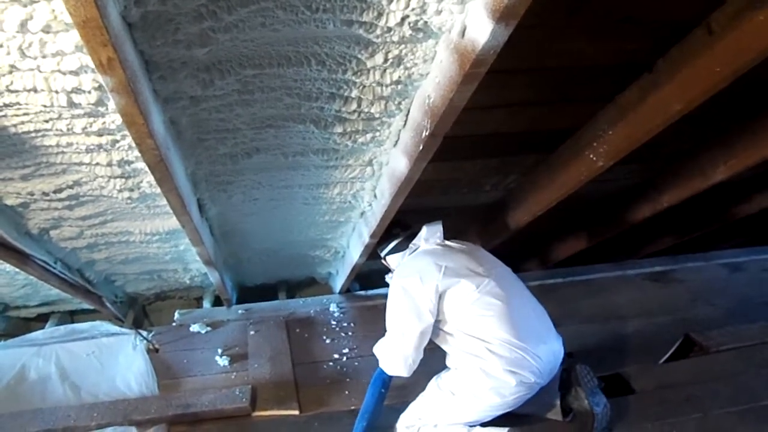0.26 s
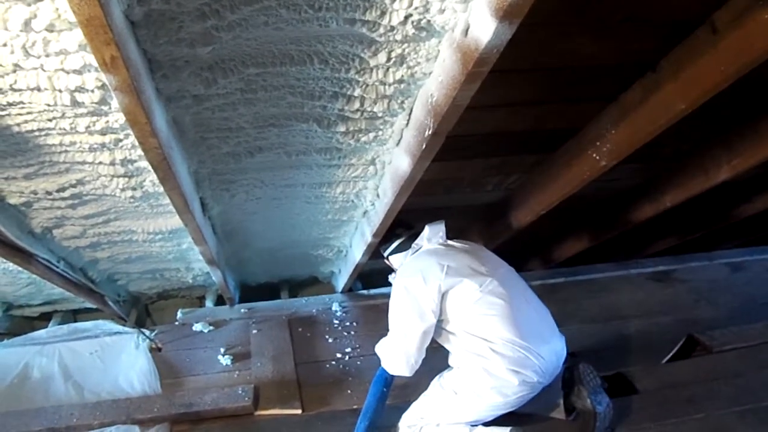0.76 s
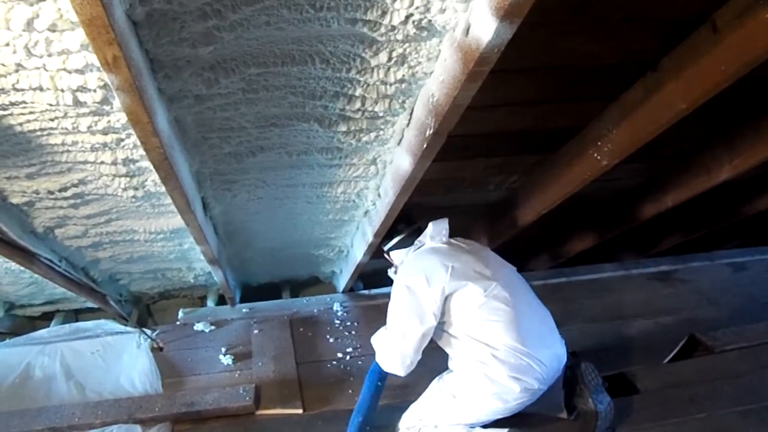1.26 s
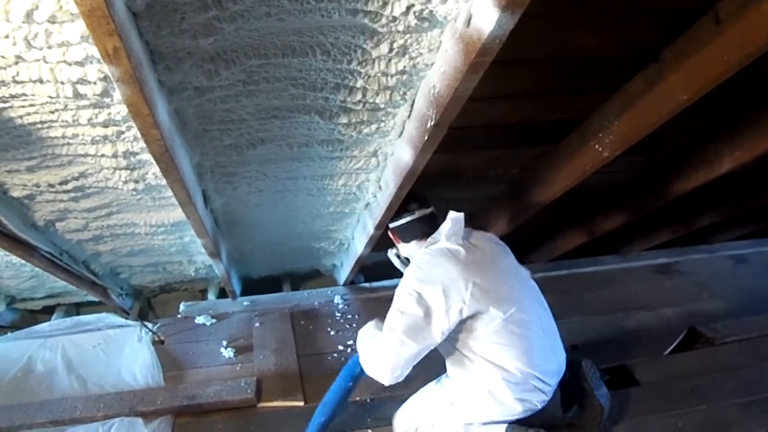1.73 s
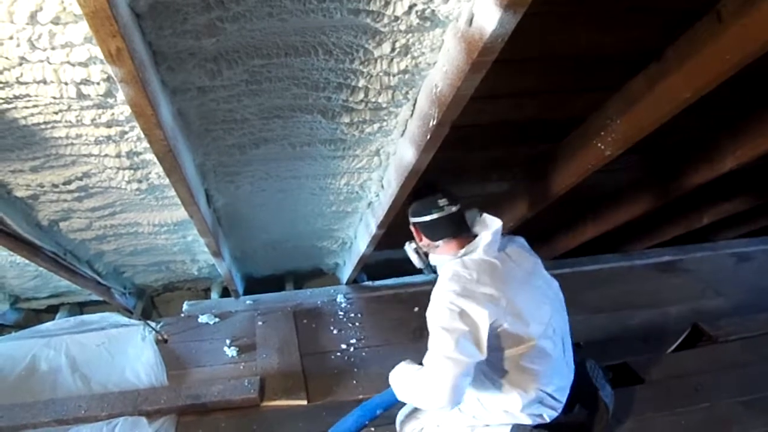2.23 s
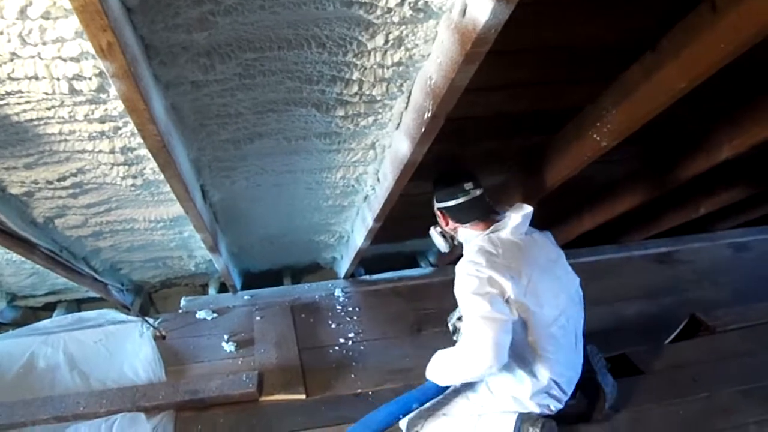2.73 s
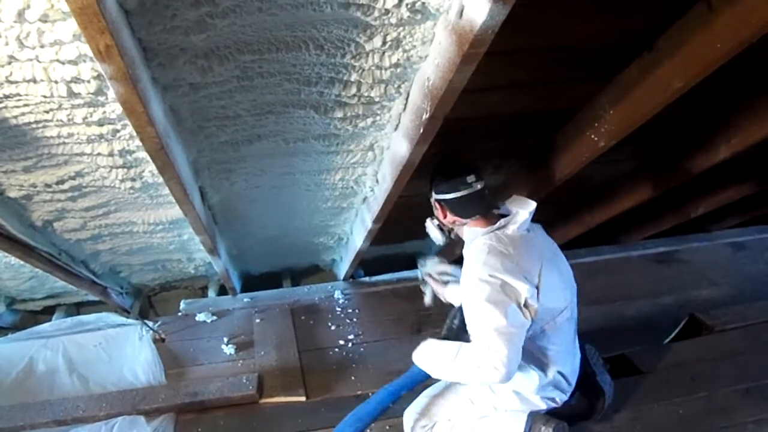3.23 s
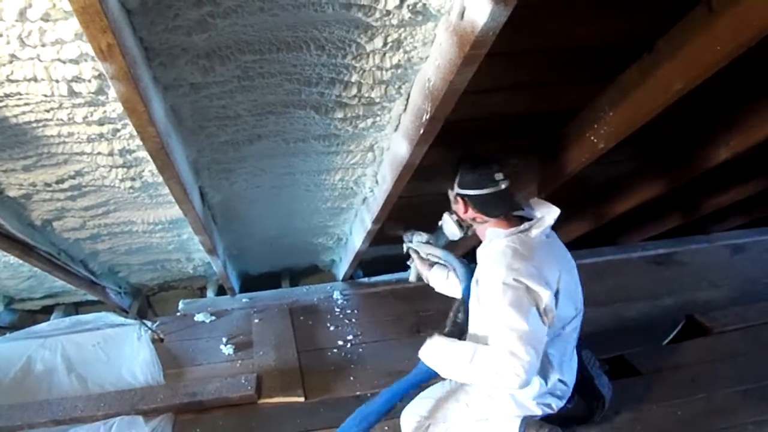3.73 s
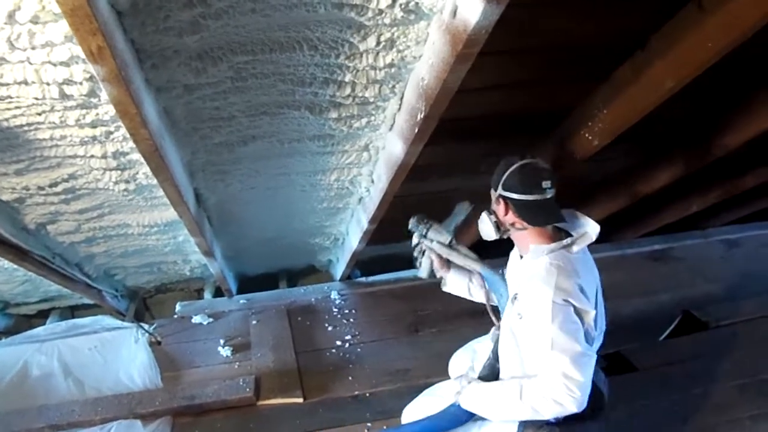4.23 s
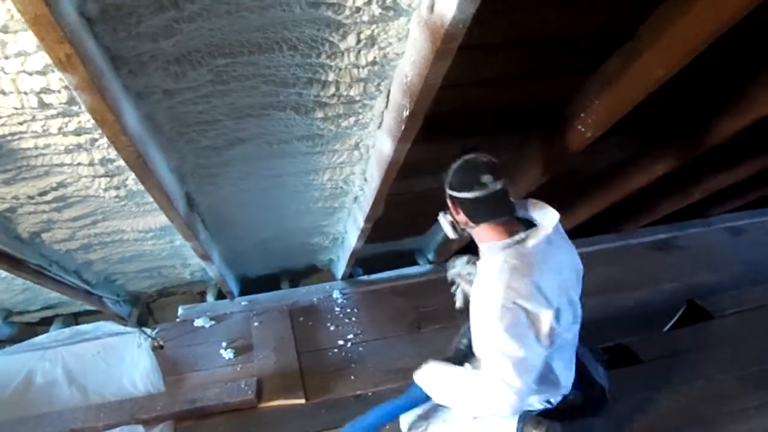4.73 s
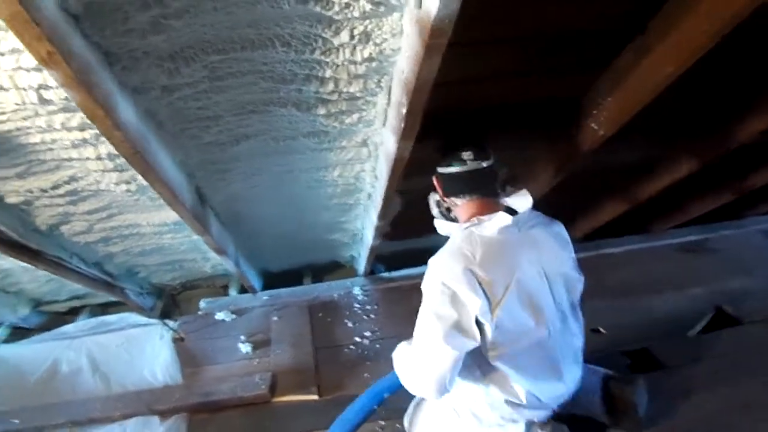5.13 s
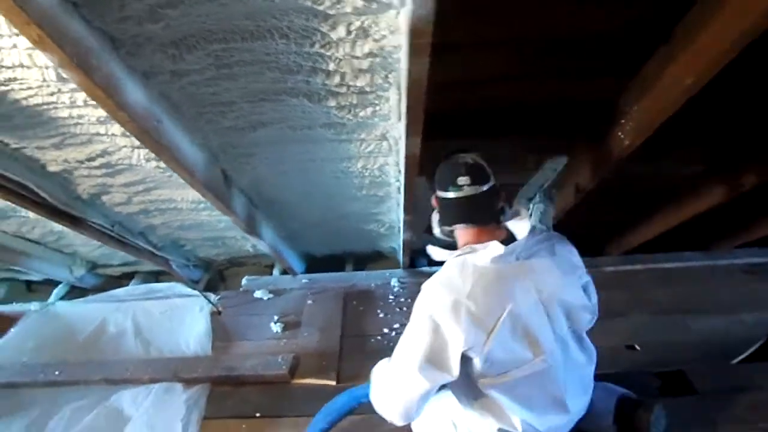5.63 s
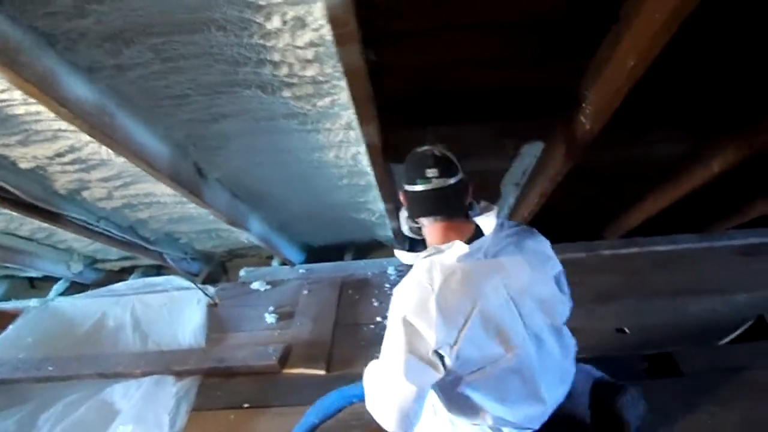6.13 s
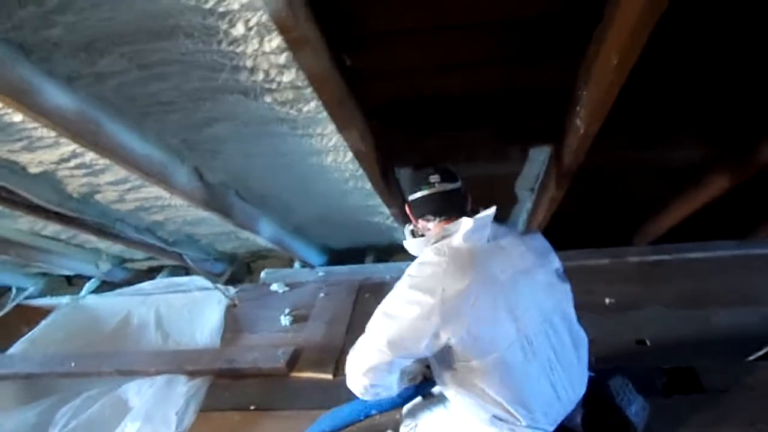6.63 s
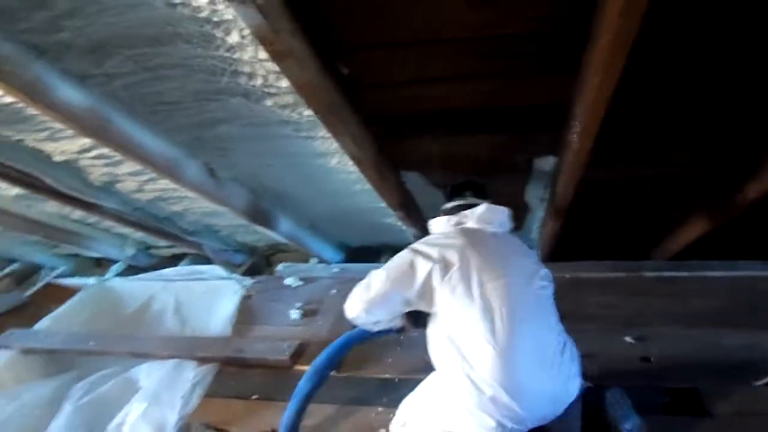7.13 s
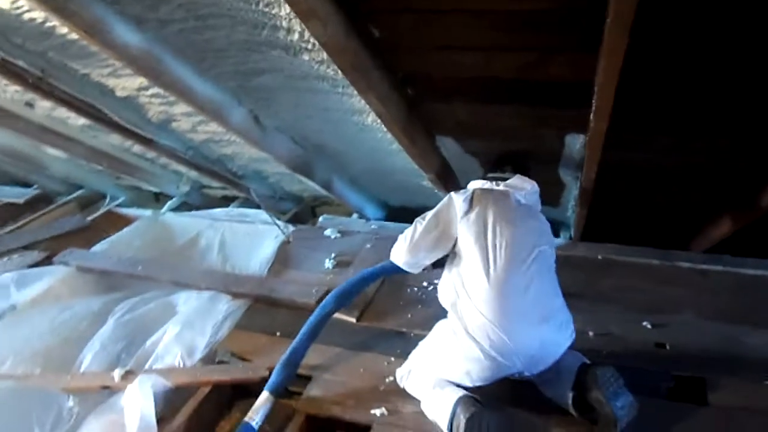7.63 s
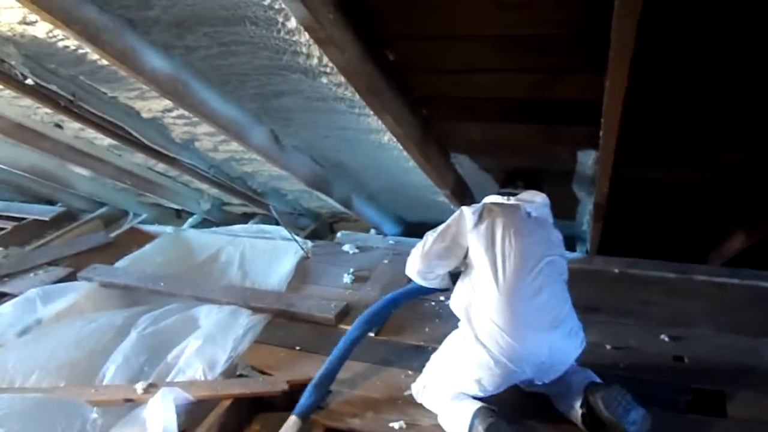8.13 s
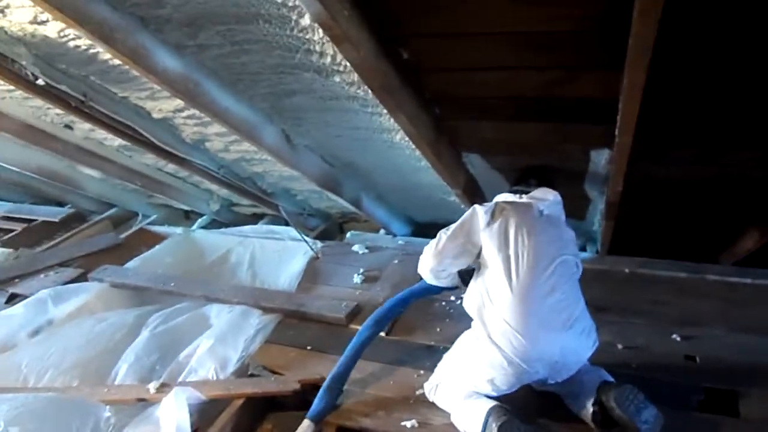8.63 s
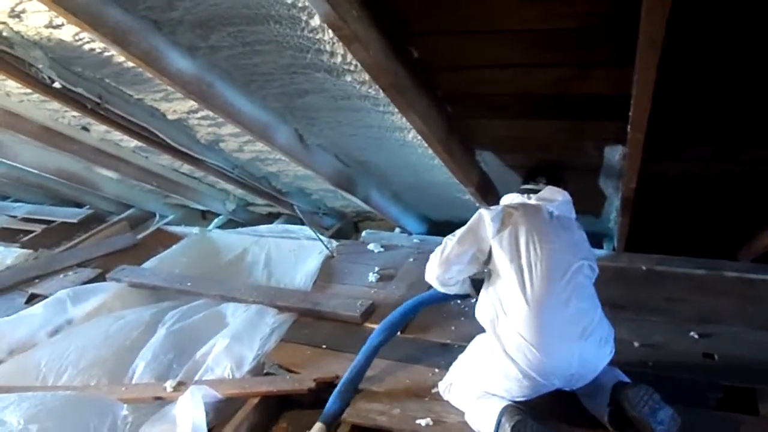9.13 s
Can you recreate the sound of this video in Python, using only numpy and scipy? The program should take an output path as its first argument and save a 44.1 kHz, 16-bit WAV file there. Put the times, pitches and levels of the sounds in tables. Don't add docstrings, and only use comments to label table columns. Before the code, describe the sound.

A foam spray gun in a wooden attic leaks a thin, steady air hiss. Four trigger pulls spit hard and settle into bright, gusty hiss with a hollow whistling edge; the first three end in a puff, the last runs on. Between them come board knocks, knee bumps, creaks and coverall rustle. A faint pump engine hums low, slowing midway. One fairly close microphone, dry with short reflections.

```python
import sys
import numpy as np
from scipy import signal
from scipy.fft import rfft, irfft, next_fast_len
from scipy.io import wavfile
from scipy.ndimage import uniform_filter1d

SR = 44100
rng = np.random.default_rng(int(sys.argv[2]) if len(sys.argv) > 2 else 0)


def put_to_file(sound):
    columns = np.atleast_2d(sound).T
    safe = np.clip(columns, -1, 1)
    whole_steps = np.round(safe * 32767)
    wavfile.write(sys.argv[1], SR, whole_steps.astype(np.int16))


def to_linear_factor(level_db):
    exponent = np.asarray(level_db, float) / 20
    return 10 ** exponent


N = 412776

# time in seconds, level in dB.
PURGE_LEVEL = [(0, -40.5), (.75, -40), (.89, -36), (2.0, -43), (2.25, -38), (2.7, -35.5), (2.9, -36.5),
               (3.63, -29), (4.14, -40), (4.75, -39.5), (5.2, -41.5), (5.72, -36.5), (6.25, -37.5),
               (6.4, -36.5), (6.9, -34.5), (7.18, -29.5), (7.3, -31.5), (7.68, -30)]
# frequency in Hz, density in dB per Hz.
PURGE_SPECTRUM = [(150, -14), (420, -18.5), (520, -20), (600, -10), (1200, -12), (1800, -13.5), (2300, -6),
                  (3300, -7.5), (5000, -1.5), (7500, 2), (9200, -0.5), (11000, 0.5), (13000, 2.5),
                  (14500, 0)]
# delay in seconds, level in dB.
ECHOES = [(.00033, -15), (.0031, -12), (.0058, -13), (.0094, -14), (.0137, -15), (.0191, -16), (.0263, -18)]
# time in seconds, speed in turns per second.
ENGINE_SPEED = [
    (0, 27.5),
    (5.36, 27.5),
    (5.8, 23.8),
    (6.5, 24.4),
    (9.36, 24.4),
]
ENGINE_ORDERS_DB = [-1, -10, -19, -9.5, -40.5]
SHAFT_ORDERS_DB = [-56, -58, -75, -74.5]
# frequency in Hz, density in dB per Hz.
DRONE_SPECTRUM = [(12, -10), (33, -4), (45, -1), (70, -3), (120, 1.5), (160, -3.5), (500, -41), (700, -17)]
# start in seconds, end in seconds, suit rustle in dB, board rumble in dB.
SHUFFLES = [(0.91, 1.884, -44.5, -52.5), (1.883, 1.976, -40, -53), (2.44, 2.72, -42, -45),
            (2.76, 3.07, -57, -48.5), (3.144, 3.32, -51, -60), (3.386, 3.64, -41, -53),
            (3.66, 4.06, -44, -51), (4.68, 4.857, -49.5, -58), (5.388, 5.654, -41, -43.5),
            (5.72, 6.2, -57, -53), (6.278, 6.38, -45, -52), (6.44, 7.012, -52.5, -52),
            (7.091, 7.338, -37, -49), (7.42, 7.68, -41.5, -45), (7.694, 8.363, -37.5, -42.5),
            (8.41, 8.9, -40, -51), (8.93, 9.4, -37.5, -40)]
# frequency in Hz, density in dB per Hz.
RUSTLE_SPECTRUM = [(200, 4.5), (500, -3.5), (1000, 0.5), (1600, -4), (2500, -5), (4000, -7), (9000, -7.5)]
# frequency in Hz, density in dB per Hz.
RUMBLE_SPECTRUM = [(40, -7), (90, 13), (180, -4.5), (280, 8), (420, 8), (700, -21), (1500, -5)]
# opening in seconds, shutting in seconds, surge in dB, pressure sag in dB per
# second, steady flow in dB.
PULLS = [
    (.908, 1.801, -21, 45.5, -37.5),
    (3.646, 3.972, -16.5, 35, -34),
    (5.282, 5.581, -25.5, 19, -35),
    (7.698, 9.5, -16.5, 46.5, -33.5),
]
# shut-off puff in dB, puff rise in seconds, low jet re hiss in dB,
# second tube mode in Hz, time to full mist in seconds.
NOZZLE = [
    (-18, 0.041, -9.5, 2260, 0.017),
    (-16.5, 0.057, -9.5, 2280, 0.038),
    (-20, 0.025, -9, 2230, 0.026),
    (-40, .03, -6.5, 2305, 0.033),
]
# time in seconds, swell in dB, detune in Hz.
SINGS = [(0.921, 1.5, -60), (0.959, -7.5, -40), (3.665, 2, -49), (3.74, 4.5, 1), (4.03, 3, -2.5),
         (5.3, -2.5, -17.5), (7.711, 2.5, -32), (8.6, 0, 19.5), (1.005, -2, -40), (1.055, 6, 40.5),
         (1.19, 8.5, -170), (1.27, 3.5, 0.5), (1.58, -1, -2), (3.798, 8, 22), (3.9, 3.5, -1),
         (5.36, 3.5, 31), (5.47, 3.5, 0), (5.65, 1.5, 4), (7.78, 5.5, 22.5), (8.04, 1, -1.5),
         (8.42, 3.5, 39), (8.72, 4, -1.5), (9.0, 1.5, -0.5), (9.2, 3, 0.5)]
# frequency in Hz, width in Hz, level in dB.
TUBE_MODES = [(742, 71, -10.5), (2302, 118, 5), (3693, 310, -3.5), (5305, 260, 4), (6870, 600, -5),
              (8470, 210, 1), (9940, 95, -3), (11400, 100, -2), (13100, 150, -3.5)]
# frequency in Hz, density in dB per Hz.
JET_SPECTRUM = [(300, -69), (1000, -8.5), (2000, -14), (3000, -6), (5000, -1), (14500, -13)]
# frequency in Hz, density in dB per Hz.
MIST_SPECTRUM = [(1000, -21), (2000, -6.5), (3000, -10.5), (5000, -7.5), (8000, 2), (11000, 4),
                 (14500, 4.5)]
# time in seconds, peak in dB, centre in Hz, dying time in seconds,
# board ringing in dB.
KNOCKS = [(1.905, -17, 565, 0.016, -13.5), (1.991, -29, 437, 0.025, -10), (2.062, -39, 350, 0.034, -24),
          (4.08, -39, 402, 0.012, -27), (5.409, -39, 268, 0.074, -6), (7.314, -24.5, 230, 0.024, -24),
          (8.955, -32.5, 510, 0.022, 3), (9.201, -28.5, 500, 0.036, 0)]
# time in seconds, #
# peak in dB, centre in Hz, dying time in seconds.
MORE_KNOCKS = [(1.907, -24, 2020, 0.016), (1.907, -33.5, 75, 0.074), (1.912, -24, 215, 0.043),
               (5.4, -34, 161, 0.092), (1.925, -29, 510, 0.13), (1.95, -30, 162, 0.12), (6.474, -39, 900, 0.014),
               (6.497, -29.5, 151, 0.022), (6.503, -30, 45.7, 0.11), (6.51, -36.5, 615, 0.044),
               (6.514, -23.5, 208, 0.048), (6.559, -38, 253, 0.32), (6.601, -39, 28, 0.2),
               (7.083, -27, 890, .014), (7.082, -36, 1720, 0.0078), (7.09, -31, 295, 0.2),
               (7.249, -22.5, 225, 0.012), (7.27, -28, 1080, 0.049), (7.275, -24, 243, .022),
               (7.35, -29.5, 282, 0.037), (7.712, -17.5, 1050, 0.005), (7.846, -20, 1402, .012),
               (7.89, -30, 210, 0.051), (7.949, -32.5, 217, 0.083), (8.14, -32.5, 234, .04),
               (8.269, -28.5, 226, 0.024)]
# frequency in Hz, level in dB, T60 in seconds.
BOARD_MODES = [(126.5, -1.5, 0.42), (272.4, 3, 0.29), (353, -8, 0.48), (710, -47, 0.15), (793, -7, 0.47),
               (1230, -18, 0.12)]
# start in seconds, end in seconds, pitch in Hz, level in dB.
CREAKS = [(3.36, 3.558, 350, -45.5), (3.588, 3.636, 357, -39), (4.36, 4.453, 378, -54.5),
          (4.67, 4.763, 345, -51), (4.747, 4.894, 303, -48.5), (5.41, 5.566, 295, -44.5),
          (7.237, 7.407, 255, -35)]

PURGE_YIELDS_DB = -5.5
ENGINE_DB, UNLOADED_DB = -43, -11
SHAFT_HZ = 30.1
DRONE_DB = -50
WHINE_HZ, WHINE_DB = 1190, -67
FAN_HZ, FAN_DB = 495, -66.5
SHUFFLE_IN_DB_PER_S, SHUFFLE_OUT_DB_PER_S = 293, 108
STILL_RUSTLE_DB, STILL_RUMBLE_DB = -68, -54
VALVE_S = .009
FIRST_MIST_SHARE = 0.44
SPIT_DB, SPIT_FILL_S = 1, 0.023
SPIT_FILL_TIMES = 1.43
CREEP_DB_PER_S, SHUT_DB_PER_S = 3, 259
RING_SHARE, RING_SHARE_PER_DB = 0.69, .025
SPIT_OVERBLOWS_SHARE, PUFF_OVERBLOWS_SHARE = 0.56, 0.51
SING_S = .025
MORE_KNOCKS_RING_DB = -26


def rms_one(x):
    return x / np.sqrt(np.mean(x ** 2) + 1e-20)


def noise():
    return rng.standard_normal(N)


def in_time(rows):
    s, *columns = np.transpose(rows)
    return [np.interp(np.arange(N) / SR, s, c) for c in columns]


def drift(rate_hz):
    r = np.exp(-80 * np.pi * rate_hz / SR)
    slow = signal.lfilter([1], [1, -2 * r, r * r], rng.standard_normal(N // 40 + 2002))
    slow = rms_one(slow[2000:])
    return np.interp(np.arange(N) / 40, np.arange(len(slow)), slow)


def colour(x, spectrum):
    hz = np.maximum(np.arange(N // 2 + 1) * SR / N, 1)
    point_hz, point_db = np.transpose(spectrum)
    gain = to_linear_factor(np.interp(np.log(hz), np.log(point_hz), point_db))
    return rms_one(irfft(rfft(x) * gain, N))


def resonate(x, hz, width_hz):
    r = np.exp(-np.pi * width_hz / SR)
    zeros = np.array([1, 0, -1]) * (1 - r * r) / 2
    poles = [1, -2 * r * np.cos(2 * np.pi * hz / SR), r * r]
    return signal.lfilter(zeros, poles, x)


def grains(per_s, spread_db):
    sizes = to_linear_factor(spread_db * np.minimum(rng.exponential(1, N), 5)) * rng.choice([-1, 1], N)
    return sizes * (rng.random(N) < per_s / SR)


def purge_air(held):
    level_db = uniform_filter1d(in_time(PURGE_LEVEL)[0], size=3000)
    level_db += PURGE_YIELDS_DB * uniform_filter1d(held, size=1500)
    flutter_db = 0.33 * drift(41) + 0.64 * drift(3.6)
    return to_linear_factor(level_db + flutter_db) * colour(noise(), PURGE_SPECTRUM)


def attic(x):
    out, now = x.copy(), np.arange(N)
    sway_samples = 2.5 * drift(.5)
    for k, (delay_s, db) in enumerate(ECHOES):
        sign = (-1) ** k
        out += sign * to_linear_factor(db) * np.interp(now - delay_s * SR - sign * sway_samples, now, x)
    return out * to_linear_factor(-0.5)


def engine():
    t = np.arange(N) / SR
    turns_per_s = in_time(ENGINE_SPEED)[0] + 0.1 * drift(1.42)
    phase = 2 * np.pi * np.cumsum(turns_per_s) / SR
    drop_s = ENGINE_SPEED[2][0]
    unloaded = np.interp(t, [drop_s - .15, drop_s + .1], [0, 1])
    out = np.zeros(N)
    for k, db in enumerate(ENGINE_ORDERS_DB):
        fade_db = UNLOADED_DB * unloaded * (k != 3)
        level = to_linear_factor(db + ENGINE_DB + fade_db + 1.35 * drift(3.9))
        out += level * np.sqrt(2) * np.sin((k + 1) * phase + k)
    for k, db in enumerate(SHAFT_ORDERS_DB):
        out += to_linear_factor(db) * np.sqrt(2) * np.sin(2 * np.pi * (k + 1) * SHAFT_HZ * t + 4.12)
    drone = to_linear_factor(DRONE_DB) * colour(noise(), DRONE_SPECTRUM)
    whine = to_linear_factor(WHINE_DB + 1.5 * drift(1.2)) * rms_one(resonate(noise(), WHINE_HZ, 14))
    fan = to_linear_factor(FAN_DB) * rms_one(resonate(noise(), FAN_HZ, 16))
    return out + drone + whine + fan


def shuffles():
    t = np.arange(N) / SR
    start, end, rustle_db, rumble_db = np.transpose(SHUFFLES)[:, :, None]
    fade_db = -SHUFFLE_IN_DB_PER_S * np.maximum(start - t, 0)
    fade_db = fade_db - SHUFFLE_OUT_DB_PER_S * np.maximum(t - end, 0)
    rustle_db = np.maximum((rustle_db + fade_db).max(axis=0), STILL_RUSTLE_DB)
    rumble_db = np.maximum((rumble_db + fade_db).max(axis=0), STILL_RUMBLE_DB)
    fabric = colour(grains(4000 * to_linear_factor(3 * drift(15)), spread_db=0.5), RUSTLE_SPECTRUM)
    boards = rms_one(colour(noise(), RUMBLE_SPECTRUM) * to_linear_factor(0.87 * drift(7.3)))
    return to_linear_factor(rustle_db) * fabric + to_linear_factor(rumble_db) * boards


def trigger():
    t = np.arange(N) / SR
    mist, low, mode_hz, share, held = np.zeros((5, N))
    sing_s, sing_db, sing_hz = np.transpose(SINGS)
    coarse_t = t[::64]
    bells = np.exp(-.5 * ((coarse_t[:, None] - sing_s) / SING_S) ** 2)
    swell_db = np.interp(t, coarse_t, bells @ sing_db)
    detune_hz = np.interp(t, coarse_t, bells @ sing_hz)
    for pull, nozzle in zip(PULLS, NOZZLE):
        opens, shuts, surge_db, sag_db_per_s, steady_db = pull
        puff_db, rise_s, low_db, hz, fill_s = nozzle
        since, after = np.maximum(t - opens, 0), t - shuts - rise_s
        surge = to_linear_factor(surge_db - sag_db_per_s * since)
        flow = np.hypot(surge, to_linear_factor(steady_db + CREEP_DB_PER_S * since))
        spit_peak = to_linear_factor(surge_db + SPIT_DB) * (SPIT_FILL_S / fill_s) ** 0.49
        spit = spit_peak * np.exp(-.5 * ((since - fill_s) / (SPIT_FILL_TIMES * fill_s)) ** 2)
        puff = to_linear_factor(puff_db) * np.clip(1 + after / rise_s, 0, 1)
        gate = np.clip(since / VALVE_S, 0, 1) * to_linear_factor(-SHUT_DB_PER_S * np.maximum(after, 0))
        filled = np.clip(FIRST_MIST_SHARE + (1 - FIRST_MIST_SHARE) * since / fill_s, 0, 1)
        mist += gate * filled * np.sqrt(flow ** 2 + spit ** 2 + puff ** 2)
        low += gate * np.hypot(flow, puff) * to_linear_factor(low_db + swell_db)
        mode_hz[t > opens - .1] = hz
        overblown = (SPIT_OVERBLOWS_SHARE * spit + PUFF_OVERBLOWS_SHARE * puff) / (flow + spit + puff)
        share += (t > opens) * (after < .2) * (RING_SHARE - overblown)
        held += (since > fill_s) * (after < .08)
    mode_hz[mode_hz == 0] = NOZZLE[0][3]
    share = np.clip(share + RING_SHARE_PER_DB * swell_db, 0, 1)
    return mist, low, mode_hz + detune_hz, share, held


def spray(mist_level, low_level, mode_hz, share):
    gusts = to_linear_factor(0.82 * drift(26))
    turbulence = noise() * gusts
    modes = []
    for k, (hz, width_hz, db) in enumerate(TUBE_MODES):
        modes.append((-1) ** k * to_linear_factor(db) * resonate(turbulence, hz, width_hz))
    shift_hz = uniform_filter1d(mode_hz, size=900) - TUBE_MODES[1][0]
    shift = np.exp(2j * np.pi * np.cumsum(shift_hz) / SR)
    analytic = signal.hilbert(modes.pop(1), next_fast_len(N))[:N]
    second = rms_one(np.real(analytic * shift))
    jet = np.sqrt(share) * second
    jet += to_linear_factor(1.5) * np.sqrt(1 - share) * colour(turbulence, JET_SPECTRUM)
    mist = to_linear_factor(-0.5) * colour(noise(), MIST_SPECTRUM) * gusts
    mist += to_linear_factor(-1.5) * np.sqrt(share) * rms_one(sum(modes))
    return low_level * jet + mist_level * mist


def knocks():
    out, t = np.zeros(N), np.arange(SR // 2) / SR
    bumps = [(*bump, MORE_KNOCKS_RING_DB) for bump in MORE_KNOCKS]
    for s, db, centre_hz, dying_s, ring_db in KNOCKS + bumps:
        rattle = rng.standard_normal(len(t)) * np.exp(-t / dying_s) * np.minimum(t / .001, 1)
        band_hz = [centre_hz / 1.5, centre_hz * 1.45]
        blow = signal.sosfilt(signal.butter(2, band_hz, "band", fs=SR, output="sos"), rattle)
        blow = signal.sosfilt(signal.butter(1, centre_hz * 2.0, fs=SR, output="sos"), blow)
        ring = np.zeros(len(t))
        for hz, mode_db, t60_s in BOARD_MODES:
            ring += to_linear_factor(mode_db) * rms_one(resonate(rattle, hz, 1.4 / t60_s)) / 6
        hit = to_linear_factor(db) * (blow / np.abs(blow).max() + to_linear_factor(ring_db - 2.5) * ring)
        at = round(s * SR)
        out[at:at + len(t)] += hit[:N - at]
    return out


def creaks():
    out, t, slips = np.zeros(N), np.arange(N) / SR, noise()
    for start, end, hz, db in CREAKS:
        load = np.sin(np.pi * np.clip((t - start) / (end - start), 0, 1)) ** .7
        tone = rms_one(resonate(resonate(slips, hz, 45), hz, 45))
        octave = rms_one(resonate(slips, 2 * hz, 170))
        out += to_linear_factor(db) * load * (tone + to_linear_factor(-8.0) * octave)
    return out


def scene():
    mist_level, low_level, mode_hz, share, held = trigger()
    gun = purge_air(held) + spray(mist_level, low_level, mode_hz, share)
    return np.tile(attic(gun) + engine() + shuffles() + knocks() + creaks(), (2, 1))


def low_pass(x):
    return signal.sosfilt(signal.butter(12, 14030, fs=SR, output="sos"), x)


def record(dry):
    return low_pass(dry)


dry = scene()
out = record(dry)
put_to_file(out)
```